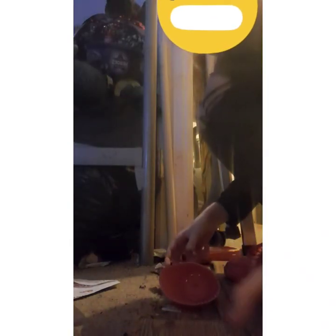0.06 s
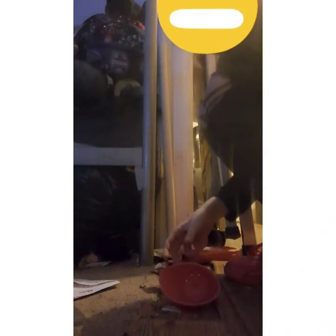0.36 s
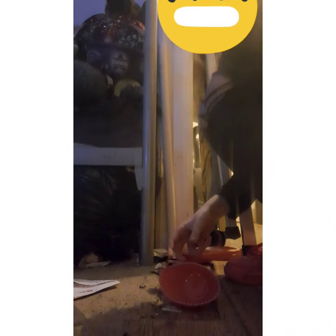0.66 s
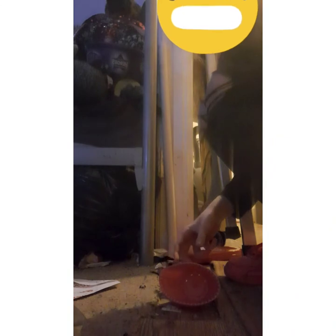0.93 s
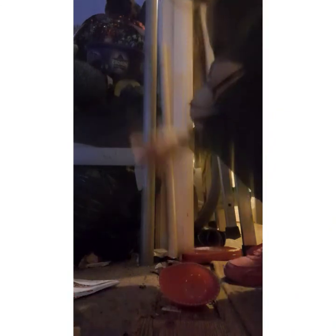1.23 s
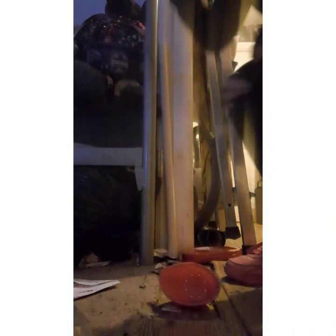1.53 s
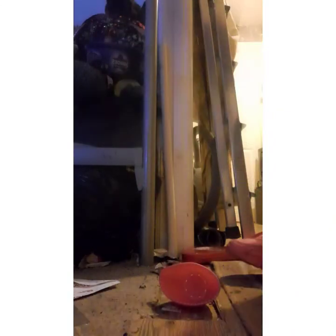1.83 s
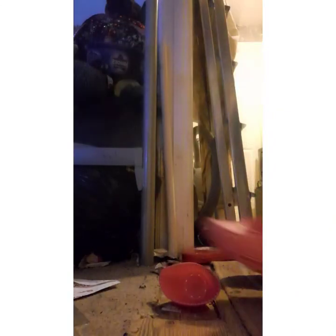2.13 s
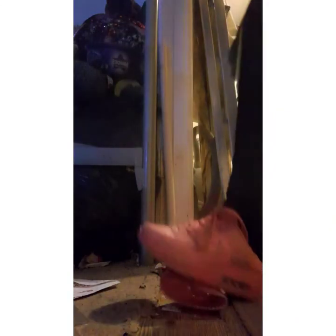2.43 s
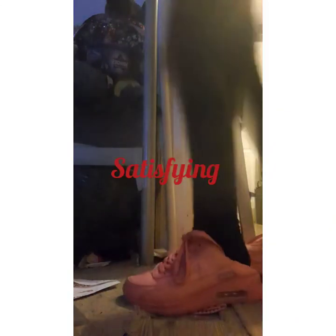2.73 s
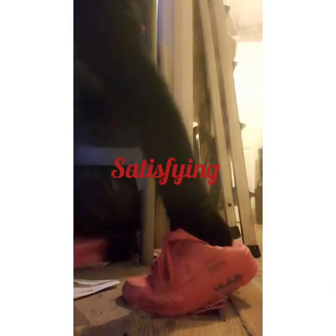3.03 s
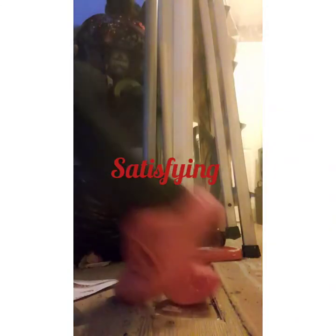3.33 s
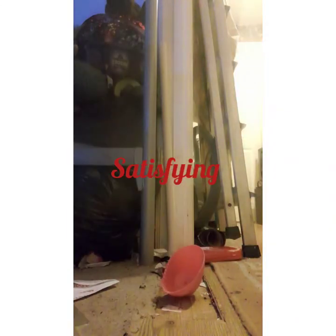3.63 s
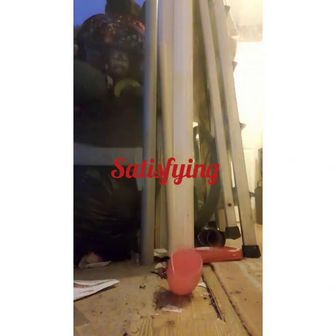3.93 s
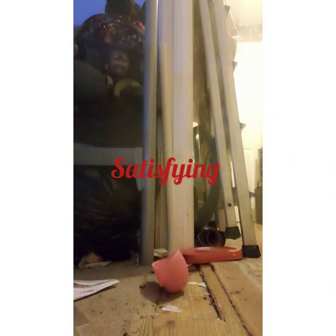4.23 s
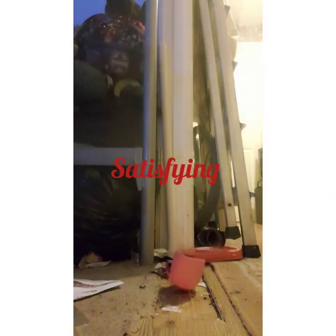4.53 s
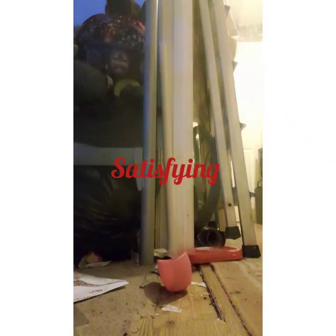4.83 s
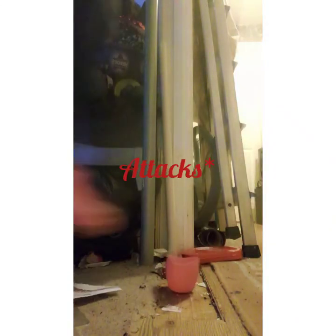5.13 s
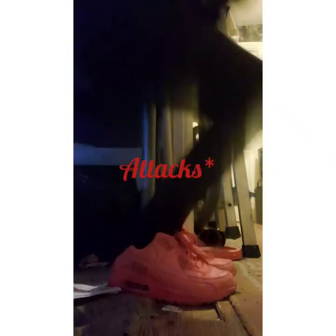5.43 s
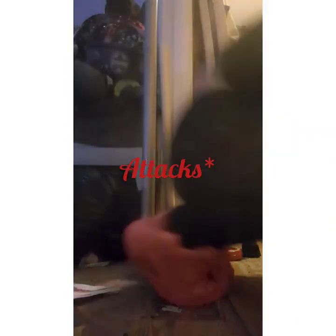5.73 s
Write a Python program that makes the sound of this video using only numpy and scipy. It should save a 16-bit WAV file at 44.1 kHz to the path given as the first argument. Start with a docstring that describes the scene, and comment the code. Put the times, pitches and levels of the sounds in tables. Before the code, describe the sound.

For the first two seconds someone moves about a small room: clothes rustle, shoes scuff, and things knock lightly with a short echo. A heavier step booms on the floorboards at about 2.1 seconds. From 2.4 to 3.4 seconds a shoe treads on a hard plastic cup, giving small cracks, pops and grinding over soft thuds. The cup springs free and, from about 3.5 to 5.2 seconds, rocks on the gritty wood with quiet crunching, taps and tiny snaps. At 5.3 seconds a loud stamp lands with a sole smack and a sharp plastic crack. A second, heavier stamp booms at 5.7 seconds, the loudest moment, followed at 5.8 by a ringing snap of plastic and a fading rustle. The microphone sits on the floor beside the cup, which sounds close and sharp, while the knocks sound further off.

```python
"""A hard plastic cup is trodden on, springs free, rolls on gritty wood, then cracks under two stamps.
Its wall pops as it bends and rings with every snap; its rim crunches grit as it rocks to and fro.
Before that, someone steps about the small room and shifts things: clothes rustle, shoes scuff, things knock.
The floorboards boom under each weight. It is all heard from a phone on the floor beside the cup,
so the cup sounds close and sharp, while the knocks further off come mostly as echo."""
import sys
import numpy as np
from scipy import signal
from scipy.fft import rfft, irfft
from scipy.io import wavfile
from scipy.ndimage import uniform_filter1d, minimum_filter1d

SR = 44100
rng = np.random.default_rng(int(sys.argv[2]) if len(sys.argv) > 2 else 0)


def persist_wave(psi):
    """Save psi, clipped to +-1, as 16-bit WAV."""
    counts = np.round(np.clip(psi, -1, 1) * 32767).astype(np.int16)
    wavfile.write(sys.argv[1], SR, np.atleast_2d(counts).T)


N = 258867
TIME = np.arange(N) / SR
USUAL_DB = -40  # an ordinary touch; louder and softer ones are shaped relative to it

# tone of the quiet background: pitch_hz, level_db
AIR_TONE = [(18, 0), (30, -17), (71, 1), (199, -11.5), (319, -9), (2010, -21.5), (2980, -26.5),
            (5740, -22), (7270, -41.5), (16000, -24)]
# swells of rumble and hiss, from the person moving, and (at 5.349 and 5.439 s) the noise rising again just
# after the first stamp: peak_s, rise_s, fall_s, rumble_db, hiss_db
SWELLS = [(.26, 0.31, 0.28, -42.5, -55), (.66, 0.29, 0.14, -51.5, -57.5), (1.0, 0.15, 0.51, -58, -62),
          (1.42, 0.44, 0.29, -68, -50.5), (1.8, 0.37, 0.38, -42, -50.5), (2.2, 0.26, 0.14, -30, -45),
          (2.48, 1, 0.56, -53, -60), (2.76, 0.61, 0.51, -50, -54.5), (3.3, 0.22, 0.25, -46, -54),
          (3.53, 0.51, 0.16, -51.5, -60), (4.11, 0.3, 0.13, -65, -65), (4.75, 0.44, 1, -64.5, -58),
          (5.349, 0.099, 0.13, -29, -44.5), (5.439, 0.42, 0.34, -52.5, -45.5),
          (5.762, 0.094, 0.66, -31, -39.5), (5.85, .08, .18, -24.5, -37.5)]
# tone of the deep rumble, like boards under shifting weight: pitch_hz, level_db
RUMBLE_TONE = [(25, -47.5), (42, -10.5), (54, -14), (72, -7), (95, -7.5), (135, -17), (200, -25),
               (500, -81.5)]
# tone of the murmur between rumble and hiss, like rubbing soles: pitch_hz, level_db
MURMUR_TONE = [(80, -11), (180, -3), (290, 8), (400, -5), (600, -5.5), (1000, -20), (3000, -37.5)]
# tone of the hiss, like rustling clothes: pitch_hz, level_db
HISS_TONE = [(300, -58.5), (800, 6.5), (1900, 6.5), (3000, 2.5), (5600, 8.5), (7500, -12.5), (12000, -7),
             (16000, -13.5)]
# hollow pops of bending plastic and wood: start_s, pitch_hz, level_db, echo_db
PANEL_POPS = [(.118, 450, -43, 15.5), (.142, 2020, -26.5, 9), (0.166, 355, -28.5, 2),
              (0.617, 2400, -33.5, 10.5), (0.629, 302, -24, -4), (0.848, 1850, -24.5, 4),
              (2.146, 524, -20.5, -2), (2.147, 307, -20.5, -1), (.373, 345, -39.5, 1), (2.635, 374, -36, 6),
              (3.021, 1140, -38.5, 5), (3.411, 1160, -37.5, 9), (3.435, 415, -34, -1.5),
              (4.028, 340, -35.5, -6), (4.244, 4870, -24, -1), (4.245, 3230, -42, 5),
              (4.246, 5650, -28, -2), (4.256, 4940, -23, -16), (4.716, 684, -31.5, -26),
              (5.277, 583, -22, 9), (5.31, 914, -18, -27), (5.309, 268, -5.5, -34), (5.723, 743, -3.5, -13),
              (5.734, 582, -11, -13), (5.742, 396, -17.5, -15), (5.8154, 3840, -26, -3),
              (5.817, 2117, -6, -13), (5.833, 1490, -21, 0)]
# things bumped and set down further off: start_s, level_db, bright_db, scrape_s
FAR_KNOCKS = [(.139, -27, -9, 0.0016), (0.165, -44, -2, 0.055), (0.229, -34, -6.5, 0.002),
              (0.305, -49.5, -4.5, 0.03), (0.371, -41.5, -14, 0.0023), (0.433, -57.5, 2, 0.0053),
              (0.507, -45, -1, 0.012), (.614, -27, -21, 0.0017), (0.647, -48, -8.5, 0.045),
              (.816, -37, -10, 0.012), (.845, -20.5, -11, 0.0046), (.885, -39, -0.5, 0.027),
              (0.98, -34, -4, 0.0058), (1.151, -50, 3, 0.0012), (1.61, -43, -2.5, 0.0067),
              (1.802, -40, -27.5, 0.0054), (1.962, -46.5, -10.5, 0.0042), (2.071, -49, -2, 0.001),
              (2.103, -43.5, -12, 0.035), (2.775, -33, -2, 0.0035), (3.019, -42, -6, 0.001),
              (3.15, -36.5, -12, 0.012), (3.171, -47, -16, 0.0019)]
# shoes scuffing the boards: start_s, level_db, top_db, scrape_s
SHOE_SCUFFS = [(1.067, -43.5, -4, 0.0015), (1.309, -47, -17, 0.022), (1.436, -44.5, -9, 0.0012),
               (1.559, -47, -8.5, 0.0017), (1.679, -35.5, -3.5, 0.0034), (1.825, -39, -9, 0.0043),
               (2.142, -34, -12.5, 0.002), (2.194, -48, -17, 0.039), (2.75, -37, -6, 0.0031),
               (3.12, -39, -12.5, 0.015), (3.304, -39.5, -12, 0.0015), (3.408, -46, -15, 0.013)]
# hollow tone of knocked boxes and boards: pitch_hz, level_db
HOLLOW_TONE = [(200, 3.5), (330, 2), (480, -3), (700, -2.5), (900, -1.5), (1200, -4.5), (1600, 0.5),
               (1950, 1.5), (2800, -4), (3400, 1.5), (4300, -0.5), (6000, 0.5), (12000, 1.5)]
# weight landing on the floor: start_s, level_db, push_ms, place (0 = mid-board, 1 = at the cup)
FLOOR_THUDS = [(0.16, -24.5, 2.77, 0.88), (.243, -34.5, 4.6, .25), (.629, -39.5, 1.34, 0.9),
               (0.856, -33.5, 7.5, 0.34), (1.411, -45.5, 5.5, 0.06), (1.76, -29, 2.9, 0.47),
               (2.018, -16.5, 11, 0.37), (2.14, -9, 3.46, 0.22), (2.5, -33, 3, .7),
               (2.743, -29, 3.17, 0.46), (3.027, -35.5, 4.1, 0.69), (3.299, -20, 11, 0.52),
               (3.437, -33, 2.34, 0.72), (3.76, -33.5, 5.6, 1), (4.06, -32, 7.3, 0.56),
               (5.136, -31.5, 2.4, 0.98), (5.276, -29.5, 2.2, 0.28), (5.31, -19, 0.98, 0.77),
               (5.72, 2, 3, .9), (5.736, 0, 4.15, 0.94), (5.815, -16.5, 1.9, 0.92), (5.826, -14, 4.5, 1)]
# notes the floor rings with: pitch_hz, ring_s, hit_mid_board_db, hit_at_cup_db
BOARD_NOTES = [(55.3, 0.38, 10.5, -32), (84.3, 0.14, -21, -3), (97.7, 0.23, 11, -10),
               (142.3, 0.22, -5.5, -6), (173, 0.27, -6.5, -27), (258.8, 0.19, 15, -4),
               (316.2, 0.11, 19, 15.5), (378, 0.033, -9, 20.5), (495, 0.099, -41, 24.5),
               (700, 0.089, -32, 23), (840, 0.074, -18, -28.5)]
# the sole slapping down on cup and floor: start_s, level_db, bright_db
SOLE_SLAPS = [(2.144, -32.5, -1), (5.1381, -31.5, -7), (5.274, -21, -29), (5.281, -18, -13.5),
              (5.31, -15, -11), (5.354, -32, -10), (5.715, -29.5, -5), (5.723, -22, 4.5),
              (5.732, -15, -5.5), (5.739, -23.5, 2)]
# notes the cup's wall rings with: pitch_hz, width_hz, level_db
CUP_NOTES = [(646, 72, -13), (1360, 200, -46), (1865, 72, -4), (2390, 810, -6), (3660, 710, -1),
             (5300, 760, -22.5)]
# the cup's wall cracking or tapping the wood: start_s, level_db, bright_db, echo_db
CUP_CRACKS = [(2.432, -40, 0.5, -1), (2.514, -37.5, -12, 1), (2.532, -34.5, -33, 1.5),
              (2.613, -37.5, -24, 11.5), (2.661, -39.5, 2.5, -5), (2.884, -35, 4, -10),
              (2.933, -29.5, -15.5, -3.5), (3.2332, -28, -11.5, -1), (3.243, -32, -8, -2),
              (3.435, -32, -5, -6.5), (3.762, -44.5, -10.5, 4), (3.849, -50.5, -15, -8),
              (3.934, -47.5, -6, 0), (4.2, -28.5, -9, -3.5), (4.214, -35.5, -3, -4),
              (4.433, -44.5, -18, 2.5), (4.488, -43, -5, 0), (4.831, -42, 4, 1), (5, -27.5, -5, -7),
              (5.053, -30.5, -31, -22), (5.128, -35, -8, 4.5), (5.179, -36, -3, -4), (5.2, -40, -6, -17),
              (5.27, -27.5, -17, 13.5), (5.3082, -7, -3, -14.5), (5.522, -39.5, 12, -20),
              (5.6, -32, -0.5, -6.5), (5.663, -35.5, 0, -3.5), (5.8165, -9, -0.5, -13),
              (5.847, -21.5, -15, 1)]
# grit and splinters snapping under the rim: start_s, level_db
SPLINTER_SNAPS = [(2.678, -31), (4.241, -28.5), (4.256, -29.5), (4.582, -39.5), (4.6, -36.5),
                  (4.621, -38.5), (4.713, -44), (4.853, -31.5), (4.885, -32), (4.91, -32), (5.172, -36.5),
                  (5.832, -16)]
# the cup grinding under the shoe, then rocking free: peak_s, rise_s, fall_s, level_db, bright_db
CUP_ROCKS = [(2.645, 0.037, 0.068, -43, -32), (3.245, 0.064, .22, -37.5, -8.5), (3.44, .06, .09, -52, 0),
             (4.02, .16, 0.085, -44, -16), (4.104, .04, 0.094, -46.5, -30), (4.196, 0.051, 0.12, -37, -17),
             (4.434, .04, 0.08, -51.5, -7), (4.702, 0.33, 0.14, -39.5, -37), (4.875, 0.057, 0.11, -51.5, 8),
             (4.955, 0.076, 0.065, -39.5, -14), (5.004, 0.042, 0.056, -36, 3.5)]
# tone of grit rubbing under the rim: pitch_hz, level_db
GRIT_RUB_TONE = [(100, -12), (330, 7), (700, 7), (1200, -4), (2200, -10), (3500, -13), (9000, -24)]
# tone of the grit's fine ticks: pitch_hz, level_db
GRIT_TICK_TONE = [(1200, -4), (3000, -6.5), (5800, -6), (7500, -18.5), (12000, -11), (16000, -9)]
# how long the room's echo takes to fade by 60 dB: pitch_hz, ring_s
ROOM_RING = [(100, 0.13), (260, 0.28), (700, 0.13), (1840, 0.26), (4850, 0.17), (12800, 0.18)]
# how the phone's two microphones differ in tone: pitch_hz, left_minus_right_db
MIC_BALANCE = [(100, -0.5), (300, -3), (700, -0.5), (1500, 0), (5000, -2), (6500, -1.5), (8000, 12.5),
               (12000, 2), (16000, 4)]


def undb(db):
    """Turn decibels into a number to multiply by."""
    return 10 ** (np.asarray(db) / 20)


def unit(x):
    """Scale a sound to an average strength (rms) of 1."""
    return x / np.sqrt(np.mean(x ** 2))


def at_hz(points, hz):
    """Look up a value between the rows of a (pitch_hz, value) table, with octaves evenly spaced."""
    pitches, values = np.transpose(points)
    return np.interp(np.log(hz + 1e-9), np.log(pitches), values)


def add(track, start_s, sound):
    """Mix a sound into the track at start_s."""
    i = int(start_s * SR)
    track[i:i + len(sound)] += sound[:N - i]


def colour(x, tone, size=2048):
    """Filter a sound so that it takes on a (pitch_hz, level_db) tone."""
    cepstrum = irfft(np.log(undb(at_hz(tone, np.arange(size // 2 + 1) * SR / size))))
    cepstrum[1:size // 2] *= 2  # fold in half, so the filter never rings ahead of a click
    cepstrum[size // 2 + 1:] = 0
    return signal.fftconvolve(x, irfft(np.exp(rfft(cepstrum))))[:len(x)]


def fade(t, ring_s):
    """A ring dying away: it drops 60 dB every ring_s."""
    return np.exp(-np.log(1000) * t / ring_s)


def swell(peak_s, rise_s, fall_s):
    """Loudness of one swell: it grows over rise_s and dies away over fall_s."""
    away = np.maximum((peak_s - TIME) / rise_s, (TIME - peak_s) / fall_s)
    return np.maximum(1 - away, 0) ** 2


def grains(samples, per_s, spread_db):
    """Tiny clicks at random moments, a few much larger than the rest."""
    sizes = undb(spread_db * np.minimum(rng.exponential(size=samples), 4))
    return rng.standard_normal(samples) * sizes * (rng.random(samples) < per_s / SR)


def contact(db, body_db, bright_db, top_db, scrape_s, hold_s, snap, rise_s, size=8192):
    """One touch: a click, then a spray of tiny slips. Harder surfaces sound brighter."""
    t = np.arange(1, size + 1) / SR
    spray = grains(size, 9000, 0.93) * np.exp(-t / max(scrape_s, .0003)) * (1 - np.exp(-t / rise_s))
    spray /= np.sqrt(np.sum(spray ** 2)) + 1e-9
    spray[0] += snap
    spray *= np.sqrt((hold_s + scrape_s / 2) * SR / np.sum(spray ** 2))  # longer touch, more energy
    widths_hz = np.array([420, 1700, 3500, 6000])  # four bands, from low to high
    band_db = db + np.array([body_db, 0, bright_db, top_db])
    body, mid, bright, top = band_db + 10 * np.log10(SR / 2 / widths_hz)
    tone = [(40, body - 28), (150, body - 8), (310, body), (750, (body + mid) / 2 + 1), (1400, mid),
            (3100, bright), (5800, bright), (7500, top - 1), (12000, top + 1), (16000, top - 3)]
    return colour(spray, tone)


def room(x, size=32768):
    """Echo of a small bare room: left and right are alike in the bass and unrelated in the treble."""
    t, hz = np.arange(size) / SR, np.arange(size // 2 + 1) * SR / size
    mid, side = rfft(rng.standard_normal((2, size)))
    apart = np.pi / 4 * np.clip(hz / 750, 0, 1)
    stereo = mid * np.cos(apart) + side * np.sin(apart) * np.array([[1], [-1]])
    octave = np.clip(np.log2((hz + 1) / 100), 0, 7)
    echo = 0
    for k in range(8):
        band = np.maximum(1 - abs(octave - k), 0)
        ring_s = at_hz(ROOM_RING, 100 * 2 ** k)
        tail = irfft(stereo * band) * fade(t, ring_s) * (1 - np.exp(-t / 0.003))  # builds, then fades
        echo = echo + tail * np.sqrt(2 * np.mean(band ** 2) / np.sum(tail ** 2))
    return signal.fftconvolve(x[None], echo, axes=1)[:, :N]


def direct(x, left_db, lag):
    """The straight path: the left side differs by left_db and is lag samples late (early if negative)."""
    left = np.pad(x, (max(lag, 0), 0))[:N]
    right = np.pad(x, (max(-lag, 0), 0))[:N]
    return np.array([undb(left_db) * left, right]) * 2 / (1 + undb(left_db))


def nearby(x, left_db, size=256):
    """A close sound: the straight path plus quick bounces off floor and shoe, different on each side."""
    tone = [(300, 0.5), (1200, 15.5), (16000, -12)]
    bounces = np.array([colour(rng.standard_normal(size), tone) for _ in range(2)])
    bounces *= np.exp(-np.arange(size) / SR / .0012)
    bounces *= undb(-5) / np.linalg.norm(bounces, axis=1, keepdims=True)
    scattered = signal.fftconvolve(x[None], bounces, axes=1)[:, :N]
    scattered *= undb([[left_db / 2], [-left_db / 2]])
    return undb(-3.5) * (direct(x, left_db, lag=7) + scattered)


def still_air():
    """The faint, steady hush of the room."""
    return np.array([unit(colour(rng.standard_normal(N), AIR_TONE)) for _ in range(2)]) * undb(-65)


def rumble_and_hiss():
    """Swells of noise stand for the person moving, and for the noise rising again just after the first stamp."""
    rumble_gain, hiss_gain = np.zeros(N), np.zeros(N)
    for peak_s, rise_s, fall_s, rumble_db, hiss_db in SWELLS:
        shape = swell(peak_s, rise_s, fall_s)
        rumble_gain = np.maximum(rumble_gain, undb(rumble_db) * shape)
        hiss_gain = np.maximum(hiss_gain, undb(hiss_db) * shape)
    murmur_gain = rumble_gain ** 0.29 * hiss_gain ** 0.71  # follows the hiss more than the rumble
    rumble = unit(colour(rng.standard_normal(N), RUMBLE_TONE)) * rumble_gain * undb(3)
    murmur = unit(room(colour(grains(N, per_s=1100, spread_db=2), MURMUR_TONE))) * murmur_gain * undb(3)
    hiss = unit(room(colour(grains(N, per_s=1200, spread_db=7.5), HISS_TONE))) * hiss_gain
    return direct(rumble, -0.11, lag=-20) + murmur + hiss * undb([[-1.5], [1.5]])


def pops():
    """A panel of plastic or wood buckles and rings briefly; its pitch sags as it relaxes."""
    near, to_room, t = np.zeros(N), np.zeros(N), np.arange(SR // 4) / SR
    for start_s, hz, db, echo_db in PANEL_POPS:
        dying = fade(t, ring_s=.03 * (hz / 1000) ** -0.65)  # smaller, higher panels stop sooner
        pitch_hz = hz * (1 + 0.063 * (dying - .5))
        phase = 2 * np.pi * np.cumsum(pitch_hz) / SR
        ring = undb(db) * dying * (1 - np.exp(-t * hz * 2)) * np.sin(phase)
        add(near, start_s, ring)
        add(to_room, start_s, ring * undb(echo_db))
    return direct(near, -2.5, lag=7) + room(to_room)


def knocks_and_scuffs():
    """Things are set down and shoes scuff further off, so they are heard mostly as echo."""
    track = np.zeros(N)
    touch = dict(hold_s=0.0062, snap=0.1, rise_s=0.0013)
    for start_s, db, bright_db, scrape_s in FAR_KNOCKS:
        body_db = -3.5 - 1.05 * (db - USUAL_DB)  # a harder blow adds clack, not boom
        top_db = -21 + 0.6 * bright_db  # harder surfaces add the highest treble
        add(track, start_s, contact(db, body_db, bright_db, top_db, scrape_s, **touch))
    for start_s, db, top_db, scrape_s in SHOE_SCUFFS:
        scuff = contact(db, body_db=-1, bright_db=3, top_db=top_db, scrape_s=scrape_s, **touch)
        add(track, start_s, scuff)
    track = colour(track, HOLLOW_TONE)
    return undb(-5.5) * direct(track, 0.27, lag=-18) + undb(1.0) * room(track)


def floor_thuds():
    """Each weight pushes the boards for a moment; a longer push leaves only the deep notes."""
    track, t = np.zeros(N), np.arange(SR // 2) / SR
    hz, ring_s, mid_board_db, at_cup_db = np.transpose(BOARD_NOTES)[:, :, None]
    signs = (-1) ** np.arange(len(hz))[:, None]  # every other note starts the opposite way
    notes = np.sin(2 * np.pi * hz * t) * fade(t, ring_s) * signs
    for start_s, db, push_ms, place in FLOOR_THUDS:
        push = np.exp(-np.pi * (t * 1000 / push_ms - 1) ** 2)
        note_db = db + mid_board_db + place * (at_cup_db - mid_board_db)
        ring = np.sum(notes * undb(note_db), axis=0)
        add(track, start_s, signal.fftconvolve(push / push.sum(), ring)[:len(t)])
    return direct(track, -1.5, lag=-14) + undb(-27.5) * room(track)


def slaps():
    """The rubber sole lands on cup and floor with a soft, low smack."""
    for start_s, db, bright_db in SOLE_SLAPS:
        slap = contact(db, body_db=17, bright_db=bright_db, top_db=-12 + .6 * bright_db,
                       scrape_s=0.0027, hold_s=0.00017, snap=0.14, rise_s=0.0024)
        yield start_s, slap, -8.5


def cup_wall(x):
    """The cup's wall rings along with whatever touches it."""
    ring = sum(undb(db) * signal.lfilter(*signal.iirpeak(hz, hz / width_hz, SR), x)
               for hz, width_hz, db in CUP_NOTES)
    return undb(-3.0) * (x + ring)


def cup_hits(hits):
    """Each hit (start_s, sound, echo_db) rings the cup close by and spills into the room."""
    near, to_room = np.zeros(N), np.zeros(N)
    for start_s, sound, echo_db in hits:
        add(near, start_s, sound)
        add(to_room, start_s, sound * undb(echo_db))
    return nearby(cup_wall(near), left_db=-6.5) + room(cup_wall(to_room))


def cracks():
    """The plastic cracks or taps the wood; stronger cracks run further and last longer."""
    for start_s, db, bright_db, echo_db in CUP_CRACKS:
        scrape_s = 0.001 * undb(0.17 * (db - USUAL_DB))
        crack = contact(db, body_db=-6, bright_db=bright_db, top_db=-19 + 0.6 * bright_db,
                        scrape_s=scrape_s, hold_s=0.00061, snap=0.6, rise_s=0.00017)
        yield start_s, crack, echo_db


def rolling():
    """The rim rocks to and fro, crushing dust and grit."""
    rub = unit(colour(grains(N, per_s=1800, spread_db=4.2), GRIT_RUB_TONE))
    ticks = unit(colour(grains(N, per_s=2000, spread_db=1.6), GRIT_TICK_TONE))
    crunch = sum((rub + undb(bright_db) * ticks) * undb(db) * swell(peak_s, rise_s, fall_s)
                 for peak_s, rise_s, fall_s, db, bright_db in CUP_ROCKS)
    track = cup_wall(crunch)
    return nearby(track, left_db=-4) + undb(-5.0) * room(track)


def splinters():
    """Grit and splinters snap under the rim; big ones burst towards the phone and have less echo."""
    for start_s, db in SPLINTER_SNAPS:
        tick = contact(db, body_db=-21.5, bright_db=-6.5, top_db=-7,
                       scrape_s=0.00034, hold_s=0.00061, snap=0.6, rise_s=0.00017)
        echo_db = -1.5 - 0.56 * (db - USUAL_DB)
        yield start_s, tick, echo_db


def scene():
    """All the sounds together; the background is a little louder on the right."""
    background = (still_air() + knocks_and_scuffs() + rumble_and_hiss()) * undb([[-1.2], [1.2]])
    cup = cup_hits([*cracks(), *splinters(), *slaps()])
    return background + cup + pops() + floor_thuds() + rolling()


def record(dry):
    """The phone tints each side, drops the deepest bass, turns loud peaks down and cuts the very top."""
    low_cut_hz, high_cut_hz, ceiling = 42, 15900, .95
    heard = np.array([colour(x, [(hz, side * db / 2) for hz, db in MIC_BALANCE])
                      for x, side in zip(dry, (1, -1))])
    thinned = signal.sosfilt(signal.butter(6, low_cut_hz, "highpass", fs=SR, output="sos"), heard)
    safe_gain = ceiling / np.maximum(abs(thinned).max(axis=0), ceiling)
    gain = uniform_filter1d(minimum_filter1d(safe_gain, size=221), size=221)  # smoothed over 5 ms
    return signal.sosfilt(signal.ellip(8, .2, 70, high_cut_hz, fs=SR, output="sos"), thinned * gain)


dry = scene()
out = record(dry)
persist_wave(out)
```